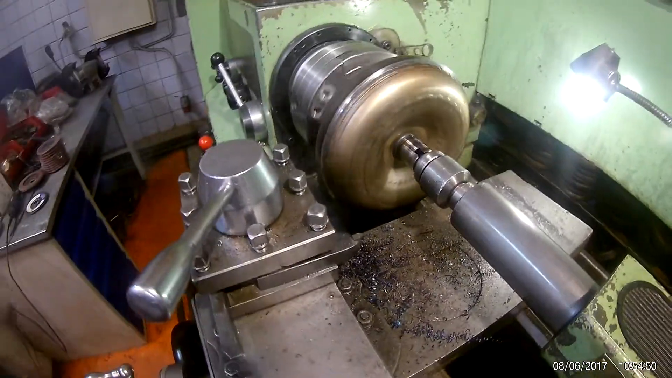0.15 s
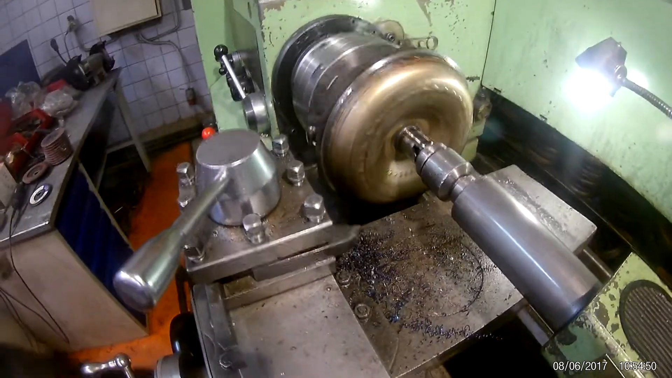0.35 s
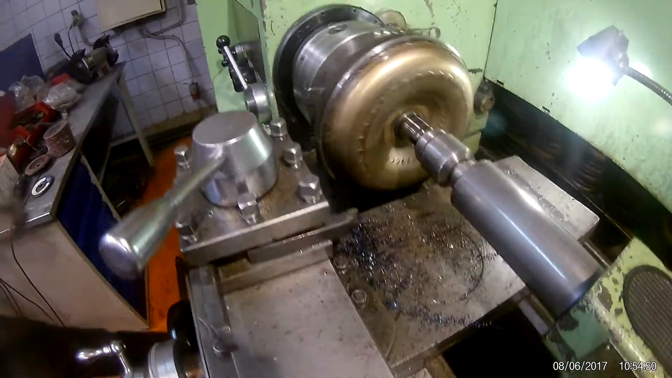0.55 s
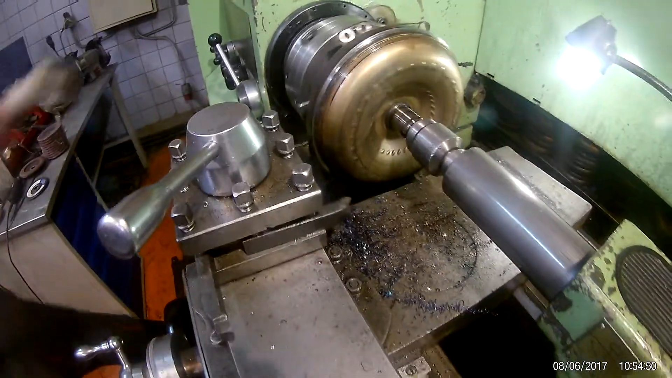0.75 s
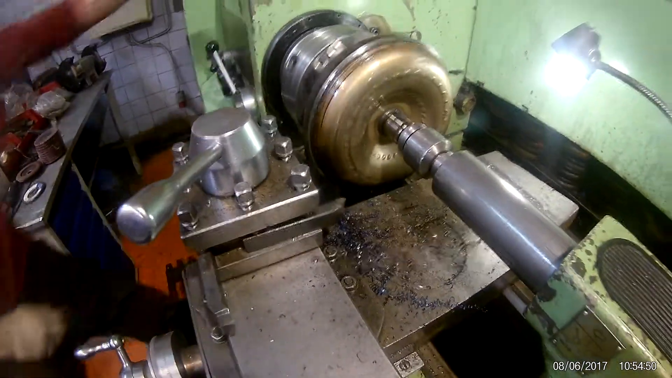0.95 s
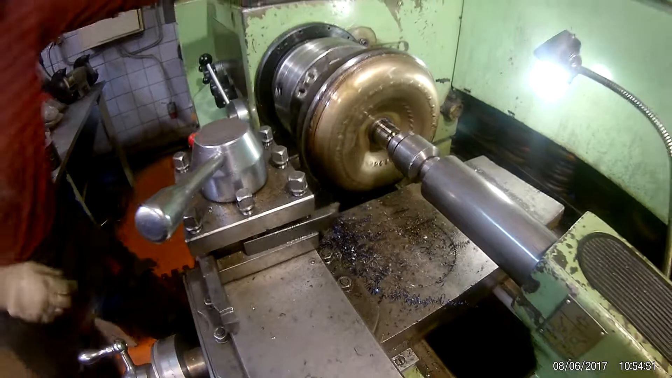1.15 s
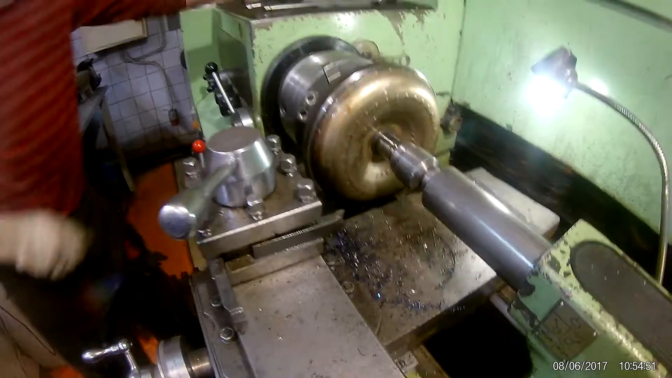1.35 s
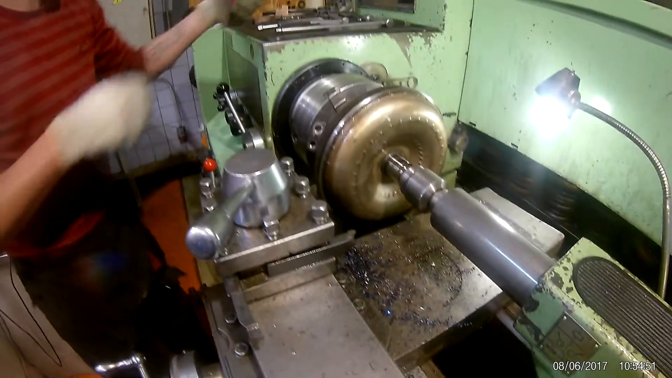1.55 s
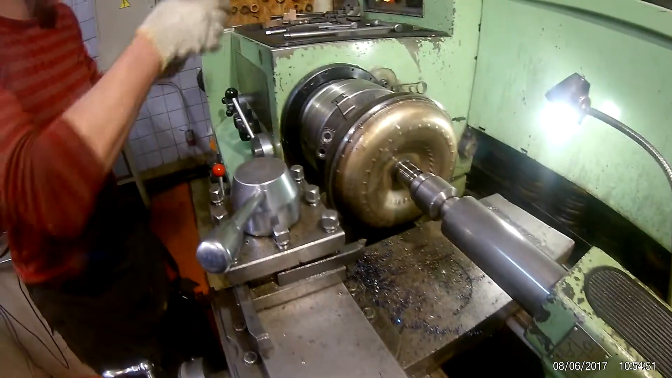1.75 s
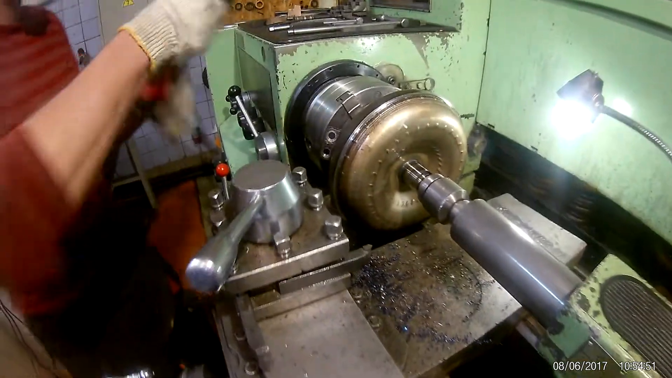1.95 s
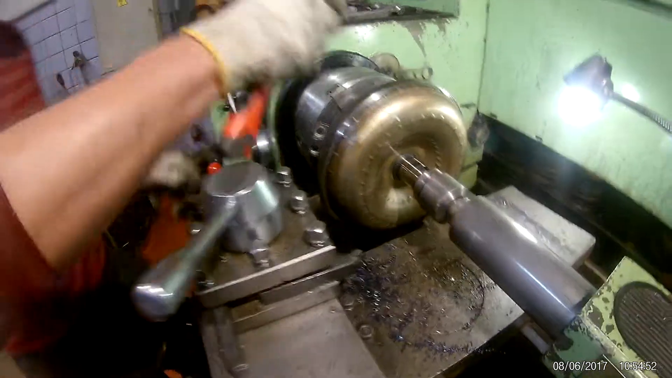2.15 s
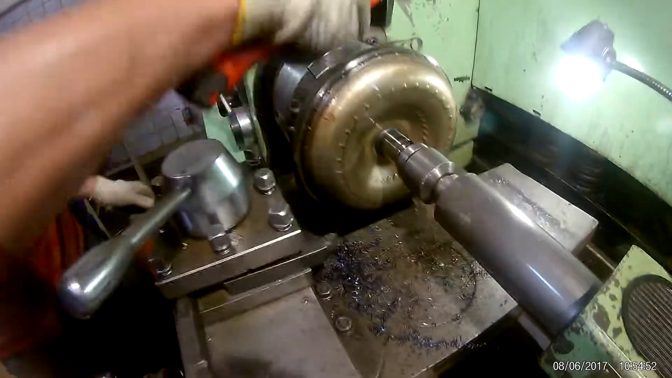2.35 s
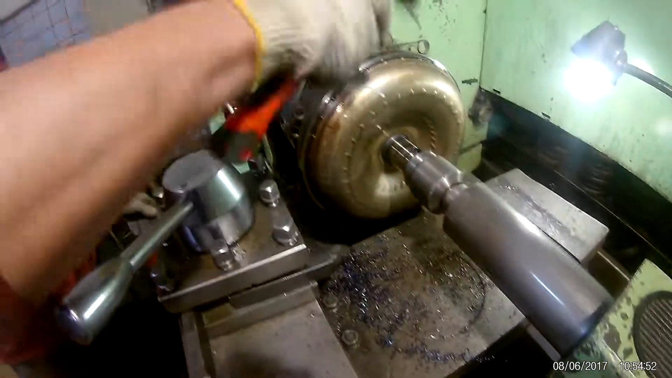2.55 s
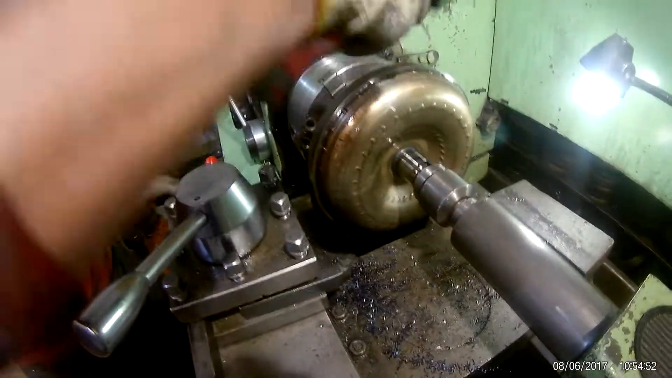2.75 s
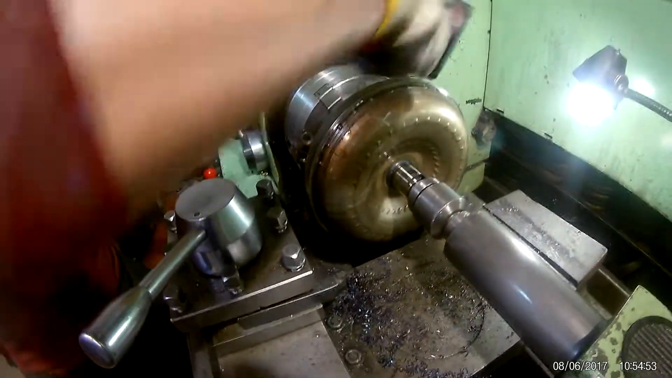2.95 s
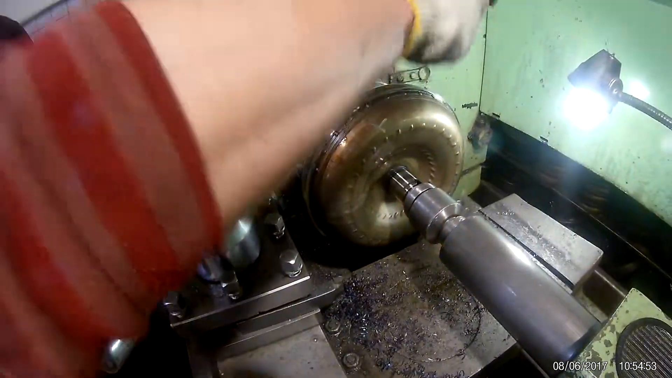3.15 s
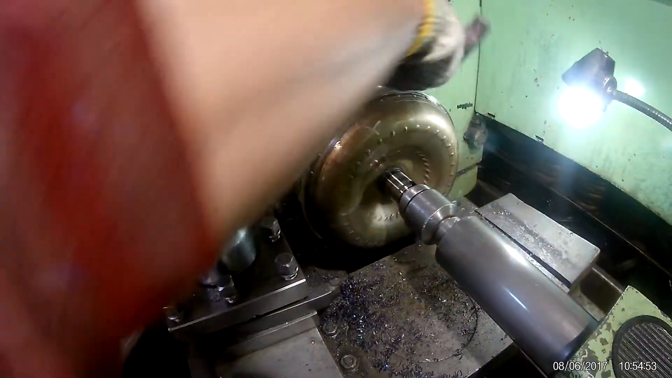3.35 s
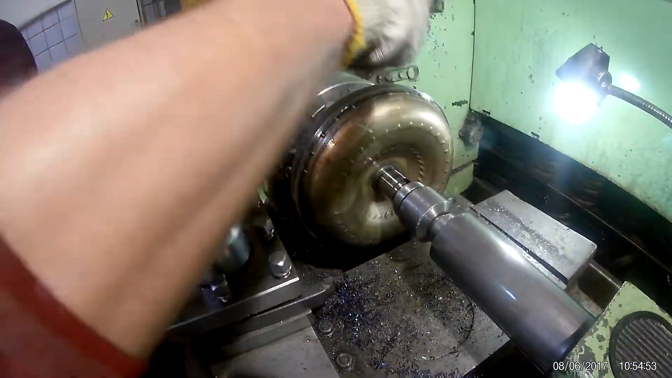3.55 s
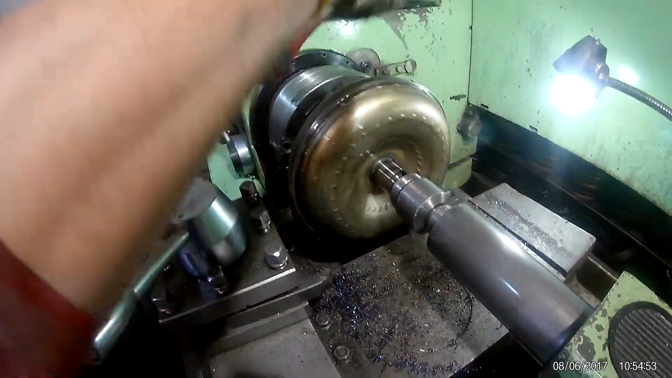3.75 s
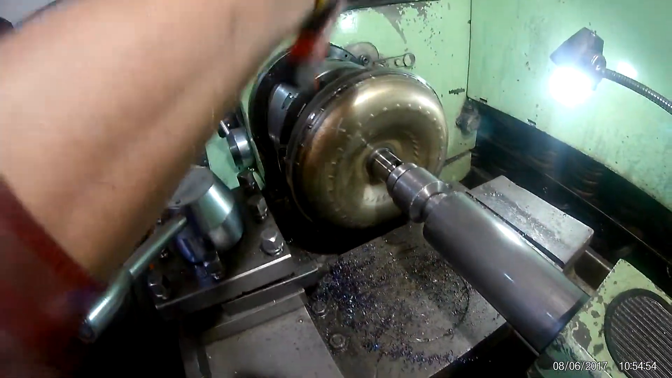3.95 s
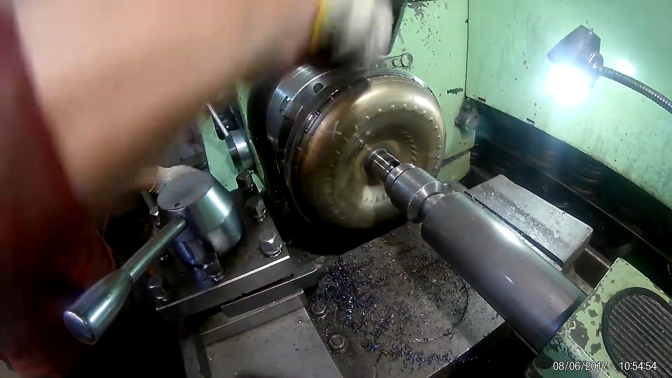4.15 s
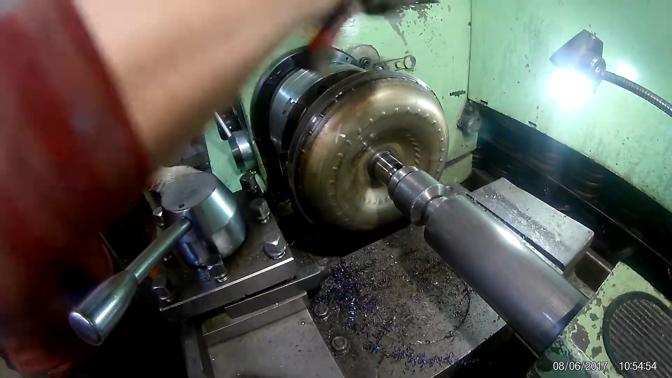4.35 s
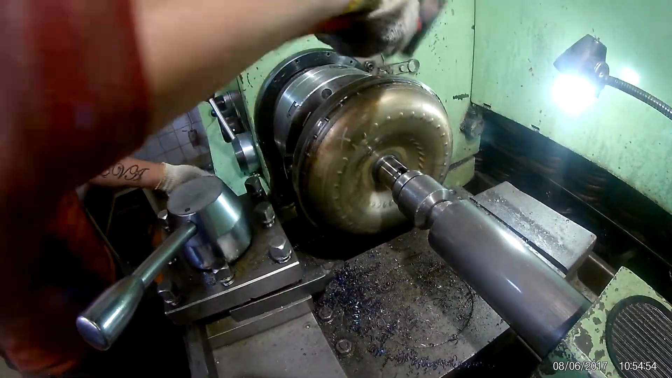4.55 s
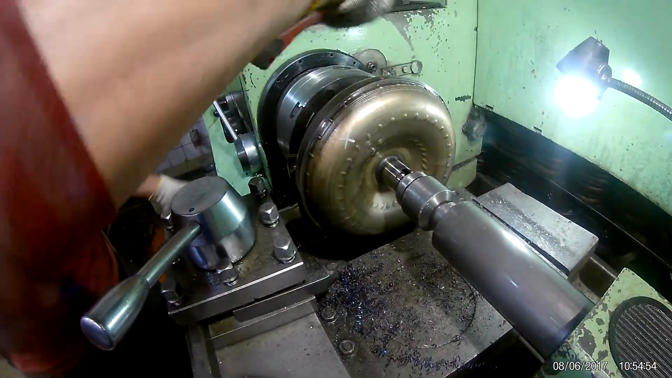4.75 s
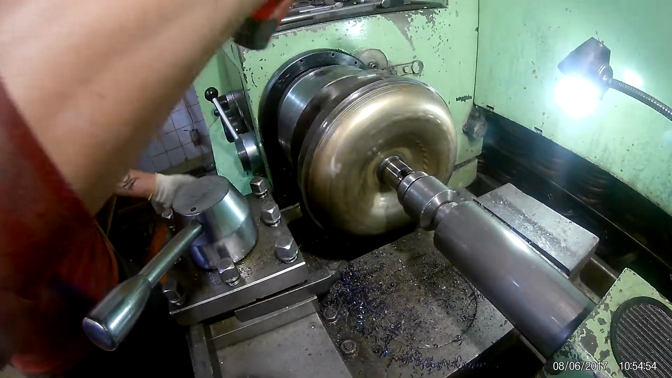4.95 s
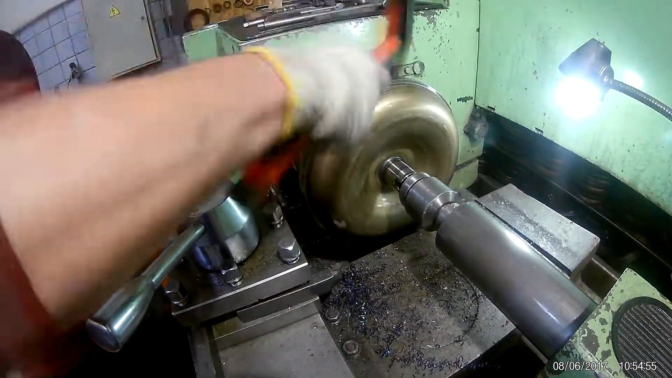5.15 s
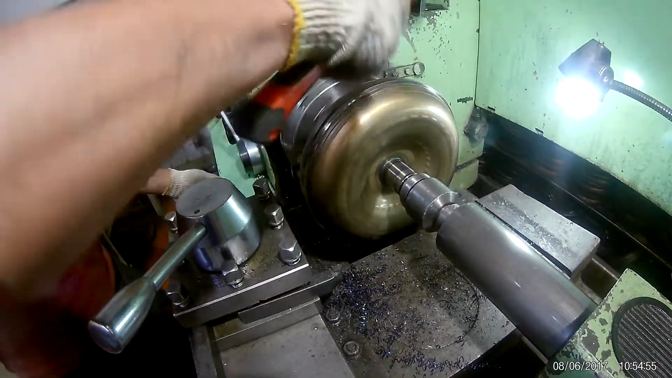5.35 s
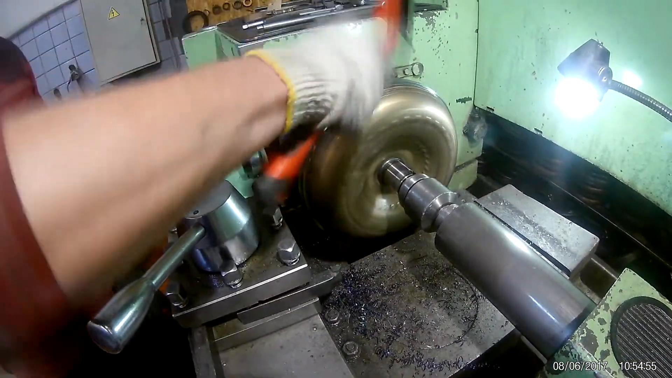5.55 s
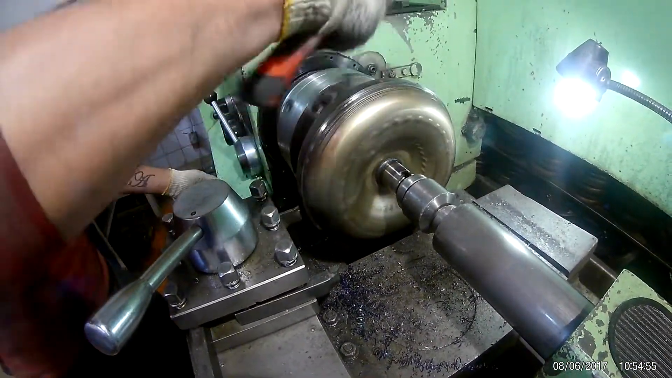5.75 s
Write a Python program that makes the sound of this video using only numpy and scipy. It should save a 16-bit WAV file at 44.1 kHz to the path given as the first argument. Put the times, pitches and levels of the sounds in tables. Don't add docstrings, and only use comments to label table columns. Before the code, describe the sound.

A lathe hums steadily in a tiled workshop, then eight loud, overloaded hammer blows crack, thud and ring on a steel shell.

```python
import sys
import numpy as np
from scipy import signal
from scipy.fft import rfft, irfft, next_fast_len
from scipy.io import wavfile
from scipy.ndimage import uniform_filter1d

SR = 44100
rng = np.random.default_rng(int(sys.argv[2]) if len(sys.argv) > 2 else 0)


def volts(x):
    e = np.asarray(x, float) / 20
    return 10 ** e


def int16_out(signal):
    q = np.round(np.clip(np.atleast_2d(signal).T, -1, 1) * 32767)
    wavfile.write(sys.argv[1], SR, q.astype(np.int16))


N = 255339


def level(x, db):
    return x * volts(db) / np.sqrt(np.mean(x ** 2))


def shape(f, spectrum):
    hz, db = np.transpose(spectrum)
    return volts(np.interp(np.log(np.maximum(f, 1)), np.log(hz), db))


def colour(x, spectrum):
    n = next_fast_len(len(x), True)
    f = np.arange(n // 2 + 1) * SR / n
    return irfft(rfft(x, n) * shape(f, spectrum), n)[:len(x)]


def coloured_noise(count, spectrum):
    return colour(rng.standard_normal(count), spectrum)


def walk(rate):
    hold = int(SR / rate)
    steps = np.repeat(rng.standard_normal(N // hold + 1), hold)
    return 1.289 * uniform_filter1d(uniform_filter1d(steps, hold), hold)[:N]


def sine(hz):
    return np.sqrt(2) * np.sin(2 * np.pi * np.cumsum(hz) / SR)


def modes(table, t, spot, cycles):
    hz, db, t60 = np.transpose(table)[:, :, None]
    db_chance, hz_chance = rng.standard_normal((2, len(table), 1))
    gain = volts(db + 1.2 * db_chance - 60 * t / t60) * shape(hz, spot)
    swell = (1 - np.exp(-t * hz / cycles)) ** 2
    tones = np.sin(2 * np.pi * hz * (1 + 0.00502 * hz_chance) * t)
    return np.sum(gain * swell * tones, axis=0)


def bursts(times, dbs, t60s, rise_s):
    clock = np.arange(0, N / SR, .002)
    t = clock - np.array(times)[:, None]
    fall_db = 60 * np.maximum(t, 0) / np.reshape(t60s, (-1, 1))
    rise_db = 20 * np.minimum(t, 0) / rise_s
    db = np.array(dbs)[:, None] - fall_db + rise_db
    return np.interp(np.arange(N) / SR, clock, np.sqrt(np.sum(volts(2 * db), axis=0)))


def add(out, s, x):
    i = int(s * SR)
    out[i:i + len(x)] += x[:N - i]


# time in seconds, strength of the second mesh multiple there in dB,
# nearness to the lathe in dB, treble let past the arm in dB.
HEAD_PLACES = [(0, -10, 2, -1), (.35, -4, 1, 0), (.7, -10.5, 0, -1), (1.1, -3, -2, 0), (1.3, 7.5, -1.5, 0),
               (2.05, 8, -1.5, -.5), (2.5, 0, 0.5, -0.5), (2.9, -7.5, 1, -2.5), (3.6, 1, 0, 3),
               (4.1, 1, -1.5, 0.5), (4.8, -7, 1.5, 2), (5.1, 9, 2.5, 1), (5.79, 1.5, 3, 0.5)]


def head_path():
    s, *columns = np.transpose(HEAD_PLACES)
    return [np.interp(np.arange(N) / SR, s, column) for column in columns]


# frequency in Hz, level in dB per Hz.
BEARING_BODY = [(24, -42.5), (40, -40.5), (75, -25.5), (151, -0.5), (209, -10), (259, -4.5), (312, -9.5),
                (451, -8.5), (519, -0.5), (587, -7.5), (837, -1.5), (1120, -19), (1600, -24.5),
                (2080, -60.5), (3520, -120)]
BEARING_TREBLE = [(940, -27), (1600, -10.5), (1710, -1), (1810, 4), (2280, 1.5), (2510, -8.5), (3010, -12),
                  (3280, -17.5), (3610, -22), (3990, -14), (4540, -29), (5340, -25.5), (6050, -34.5),
                  (6940, -32), (7600, -38.5), (9880, -72), (16700, -120)]


def bearings():
    _, near_db, clear_db = head_path()
    body_db = -33 + near_db + 0.66 * walk(17)
    treble_db = -51.5 + clear_db + .6 * walk(25)
    body = level(coloured_noise(N, BEARING_BODY), 0.87) * volts(body_db)
    treble = level(coloured_noise(N, BEARING_TREBLE), -0.74) * volts(treble_db)
    return body + treble


MESH_LEVELS = [-35.8, -42.5, -39.5]
MESH_STANDING = [0.09, 0.995, -.25]
# frequency in Hz, level in dB, pitch wander in Hz.
GEAR_PAIRS = [(125, -48.5, 6), (171.9, -46.5, 6.16), (186.75, -40.5, 5.11), (546.6, -44.5, 4.232),
              (592.5, -53, 5), (733.3, -46.5, 12), (844.2, -49.5, 4.5), (955, -51.5, 3), (1047.4, -52, 3)]


def gears():
    standing_db = head_path()[0]
    mesh_hz = 261.15 + 0.898 * walk(4)
    out = np.zeros(N)
    for k, (db, share) in enumerate(zip(MESH_LEVELS, MESH_STANDING)):
        out += volts(db + share * standing_db + 1.7 * walk(7)) * sine((k + 1) * mesh_hz)
    for hz, db, wander_hz in GEAR_PAIRS:
        out += volts(db + 3.8 * walk(6)) * sine(hz + wander_hz * walk(9))
    return out


# time in seconds, level in dB, seconds to die by 60 dB.
HEAD_SWAYS = [(.1, -52, 1.5), (.46, -47, 1.5), (.86, -32, 2.2), (1.4, -48, 2), (1.73, -43.5, .5),
              (1.87, -46.5, .5), (2.03, -46, 0.7), (2.2, -44.5, 0.05), (2.7, -49.5, 2), (3.35, -51.5, 1),
              (3.76, -43.5, 2), (3.98, -46, 2), (4.92, -47, 1.5), (5.04, -39, .6), (5.7, -50, 0.5)]


def buffeting():
    rumble = coloured_noise(N, [(10, -16), (18, 0.5), (35, 6.5), (60, 3.0), (120, -2.0),
                                (300, -62.5), (1000, -130)])
    still_db = -54.5
    return level(rumble, 0) * np.hypot(bursts(*zip(*HEAD_SWAYS), rise_s=.05), volts(still_db))


# time in seconds, level in dB.
RUSTLE_PULSES = [
    (.835, -27),
    (.905, -30),
    (.97, -34),
    (1.04, -39.5),
]


def rustle():
    rub = coloured_noise(N, [(60, -17.5), (120, -1.0), (350, -7.5), (620, 1.5), (1000, -10), (2200, -25),
                             (3000, -42), (6000, -110), (12000, -140)])
    return level(rub, 0) * bursts(*zip(*RUSTLE_PULSES), t60s=.35, rise_s=.015) * volts(1.3 * walk(40))


# frequency in Hz, level in dB per Hz.
STEEL_CRACK = [(500, -27), (1200, 3), (2200, 5), (2700, -2.5), (4200, -16), (4700, -22), (5500, -27),
               (7000, -29), (8000, -41), (12000, -68.5)]
# frequency in Hz, level in dB, seconds to die by 60 dB.
MOUNT_MODES = [(16.6, -23, 1.1), (33, -27, .7), (610, -18, .2), (545, -19, .18), (480, -24, .14),
               (830, -23, .1), (320, -25, .3), (120, -26, .3)]
# frequency in Hz, level in dB, seconds to die by 60 dB.
CHIP_MODES = [(1600, -48.5, .02), (2080, -49.5, .02), (2870, -51, .03), (3240, -48, 0.057),
              (4020, -62, .02), (5200, -66.5, .02)]


def bump_and_tick():
    out, t = np.zeros(N), np.arange(2 ** 15) / SR
    evenly = [(10, 0), (9000, 0)]
    bump = modes(MOUNT_MODES, t, evenly, cycles=.1) * (1 - np.exp(-t / .008))
    scrape = level(coloured_noise(len(t), STEEL_CRACK), -44) * volts(-60 * t / .04)
    add(out, .824, bump)
    add(out, .081, modes(CHIP_MODES, t, evenly, cycles=1.5) + scrape)
    return out


# frequency in Hz, level in dB per Hz.
ROOM_COLOUR = [(47, -44.5), (80, -26.5), (108, -9), (183, -5.5), (202, -7.5), (229, -30), (253, -14),
               (367, -13.5), (554, 1), (780, -0.5), (1210, -12.5), (2170, -18), (2400, -25), (3120, -53),
               (5280, -120)]
# frequency in Hz, level in dB per Hz.
HOUSING_RIPPLE = [(2300, -60), (2600, -34), (3100, -29.5), (3350, -45.5), (4100, -40.5), (4700, -56.5),
                  (5350, -50.5), (6050, -61), (6700, -53.5), (7400, -67.5), (8000, -78), (8500, -71.5),
                  (9000, -67), (9600, -84.5), (12000, -120)]
# frequency in Hz, seconds to die by 60 dB.
ROOM_DECAY = [(100, 1), (300, 0.6), (700, 0.6064), (1500, 0.706), (3000, 0.855), (7000, 0.675)]


def reverb(t, treble_db):
    f = np.arange(len(t) // 2 + 1) * SR / len(t)
    gain = np.hypot(shape(f, ROOM_COLOUR), shape(f, HOUSING_RIPPLE))
    noise = irfft(rfft(rng.standard_normal(len(t))) * gain, len(t))
    spectrum = rfft(level(noise, 0))
    decay_hz, decay_s = np.transpose(ROOM_DECAY)
    out = np.zeros(len(t))
    for hz in 70 * 2 ** np.arange(0, 7.6, .5):
        octaves_away = np.log2(np.maximum(f, 1) / hz)
        share = np.cos(np.pi * np.clip(octaves_away, -.5, .5)) ** 2
        t60 = np.interp(np.log(hz), np.log(decay_hz), decay_s)
        tilt_db = treble_db * max(np.log2(hz / 700), 0) / 3
        out += irfft(spectrum * share, len(t)) * volts(tilt_db - 60 * t / t60)
    return out * (1 - np.exp(-t / 0.011))


# delay in seconds, level in dB.
WALL_ECHOES = [
    (.039, -23.5),
    (.073, -29),
    (.175, -21),
]


def add_echoes(out, s, thud, t):
    wall = signal.butter(2, 1300, fs=SR, output="sos")
    for delay, db in WALL_ECHOES:
        add(out, s + delay, signal.sosfilt(wall, thud * volts(db - 60 * t / .08)))


def seat(t):
    from_hz, to_hz, climb_s = 530, 830, .12
    hz = to_hz - (to_hz - from_hz) * np.exp(-t / climb_s)
    ring = np.sin(2 * np.pi * np.cumsum(hz) / SR)
    return ring * (1 - np.exp(-t / .05)) * volts(2.2 * walk(30)[:len(t)] - 60 * t / 1.1)


def crack(t, db):
    push = (1 - np.exp(-t / 0.00061)) ** 2
    return level(coloured_noise(len(t), STEEL_CRACK), db) * push * volts(-60 * t / 0.0495)


# frequency in Hz, level in dB,
# share of the bulge (dB per dB), share of the rim (dB per dB).
STRUCK_SPOT = [(60, -4, .4, -.4), (302, -3, -0.055, 0.013), (448, -8, .5, -.3), (499.54, 0, -0.0065, 0.094),
               (595, -.5, 1.1, 0.095), (791.7, -1, .9, -0.105), (891.6, 1, -0.28, 0.87),
               (1017, 0, 0.187, 1.2), (1400, -4, 0.036, -0.0015)]
# frequency in Hz, level in dB, seconds to die by 60 dB.
SHELL_THUD = [(40, -29.5, .06), (163.14, -9.5, 0.18), (336.94, -13.5, 0.18), (445.7, 0, 0.076),
              (496.33, 3, 0.086), (585.15, 1.5, 0.0826), (713.1, -7.5, 0.04), (776.1, -2, 0.066),
              (808.05, -0.5, 0.081), (867.13, 3.5, 0.0647), (918.2, -3, 0.0905), (1002.8, -0.5, 0.0693),
              (1121.3, -8, 0.056), (1322.7, 1.5, 0.0399), (1445, -7.5, 0.063), (1708.4, 1.5, 0.0328),
              (1965.3, -1, 0.0302), (2222, -5.5, .04), (3049, -12, 0.023), (3694, -21.5, 0.016),
              (4086, -14.5, 0.028), (5973, -26.5, 0.014), (6640, -39.5, .02)]
# frequency in Hz, level in dB, seconds to die by 60 dB.
MACHINE_RING = [(120.78, -15, 0.55), (150.73, -6.5, 0.704), (168.82, -7.5, 0.66), (184.6, -12.5, 0.92),
                (414.8, -6.5, 0.33), (542.7, -3.5, 0.402), (600.8, -4.5, .4), (642, -5.5, 0.24),
                (714.7, -9.5, .4), (761.7, -12, 1), (800.3, -9, 0.42), (838.2, -7.5, 0.4),
                (998.2, -7.5, .41), (1147, -19.5, .4)]
# time in seconds, strength in dB, hardness in dB, weight on the bulge in dB,
# weight on the rim in dB.
HAMMER_BLOWS = [
    (2.2476, 4, 0, -8, -1.5),
    (2.575, 2.5, -0.5, -7.5, 3),
    (2.888, 4.5, -2, -2, 3),
    (3.233, 6, -1.5, 3.5, -.5),
    (4.089, 7, 1.5, -3.5, -3),
    (4.456, 6.5, 3.5, -1, -10),
    (5.16, 7, 1, 2, 0),
    (5.564, 9, -4.5, 1, -8),
]


def hammer():
    out, t = np.zeros(N), np.arange(2 ** 15) / SR
    short = t[:2 ** 13]
    for s, peak_db, hard_db, bulge_db, rim_db in HAMMER_BLOWS:
        spot = [(hz, db + bulge * bulge_db + rim * rim_db) for hz, db, bulge, rim in STRUCK_SPOT]
        thud = modes(SHELL_THUD, short, spot, cycles=0.73) * volts(0.8825 * peak_db - 4.5)
        ring_db = .6 * peak_db + .6 * hard_db - 15.0
        room_db = 1.209 * peak_db + .3 * hard_db - 16.5
        seat_db = 1.209 * peak_db - .2 * rim_db - 27
        add(out, s, crack(short, peak_db + hard_db - 13.8) + thud)
        add(out, s, modes(MACHINE_RING, t, spot, cycles=2.2) * volts(ring_db))
        add(out, s, reverb(t, hard_db) * volts(room_db))
        add(out, s, seat(t) * volts(seat_db))
        add_echoes(out, s, thud, short)
    return out


def scene():
    lathe = bearings() + gears()
    housing = buffeting() + rustle() + bump_and_tick()
    return (lathe + housing + hammer())[None]


# frequency in Hz, level in dB.
ELECTRONIC_WHINE = [
    (12796, -103),
    (12877, -105),
]


def electronics():
    hiss = level(coloured_noise(N, [(6000, -4.5), (12000, -5.5), (15700, -3)]), -76)
    return hiss + sum(volts(db) * sine(np.full(N, hz)) for hz, db in ELECTRONIC_WHINE)


def band_limit(x):
    return signal.sosfilt(signal.butter(12, 16140, fs=SR, output="sos"), x)


def record(dry):
    knee = 7.0
    clipped = .985 * dry / (1 + np.abs(dry) ** knee) ** (1 / knee)
    padded = np.r_[clipped[0], clipped[0, ::-1]]
    dull = colour(padded, [(4000, 0.5), (7000, 4), (7600, -9.5), (8050, -23.5), (8400, -11), (8800, -0.5),
                           (10500, 13), (13000, 0.0), (15500, -13.5)])[:N]
    start = np.minimum(np.arange(N) / 44, 1)
    top_cut = signal.ellip(10, .2, 60, 15750, fs=SR, output="sos")
    converted = signal.sosfilt(top_cut, dull * start + electronics())
    from_edge = np.minimum(np.arange(N), np.arange(N)[::-1])
    fade = np.sin(np.pi / 2 * np.clip(from_edge / (.002 * SR), 0, 1)) ** 2
    finished = np.clip(converted * fade, -1, 1)[None]
    return band_limit(finished)


dry = scene()
out = record(dry)
int16_out(out)
```